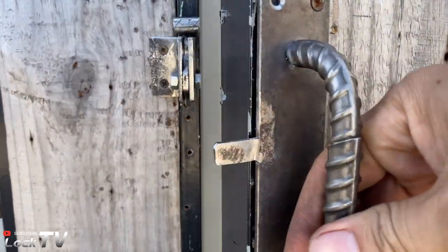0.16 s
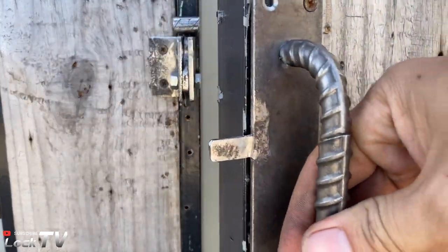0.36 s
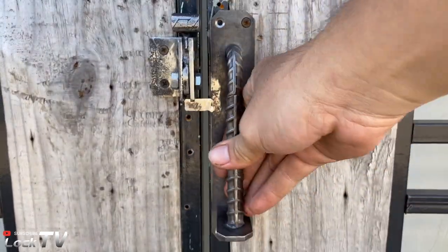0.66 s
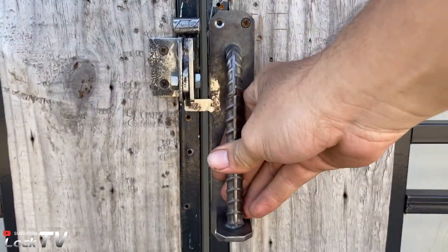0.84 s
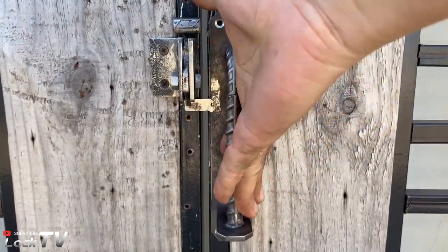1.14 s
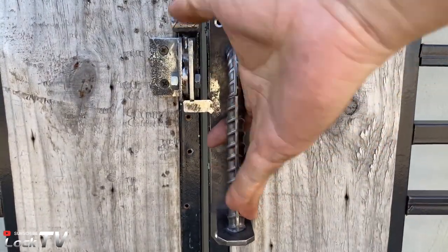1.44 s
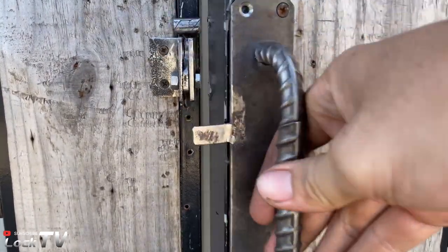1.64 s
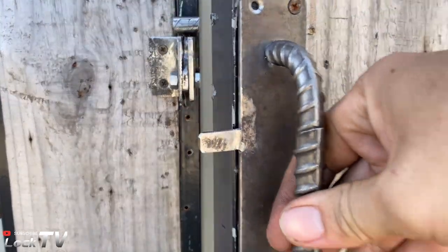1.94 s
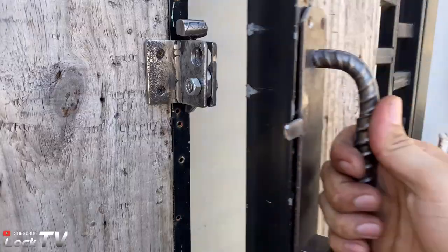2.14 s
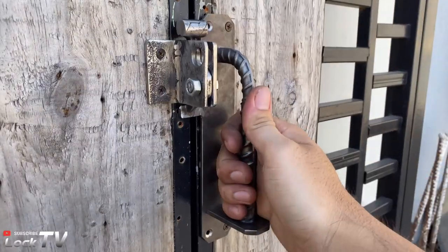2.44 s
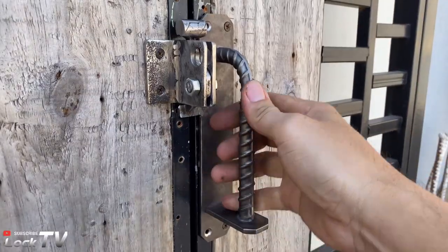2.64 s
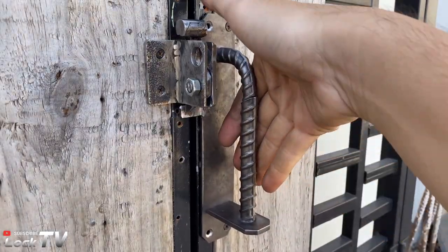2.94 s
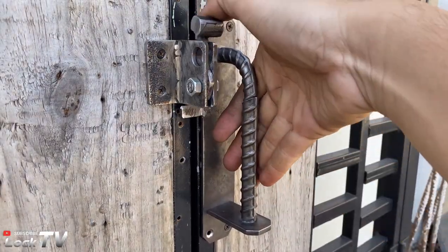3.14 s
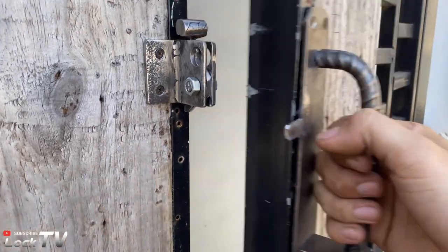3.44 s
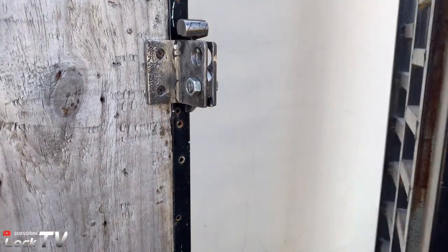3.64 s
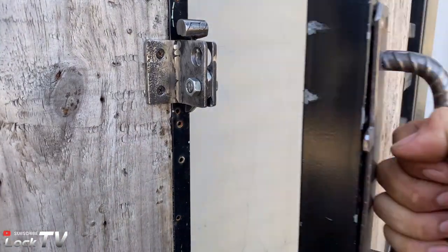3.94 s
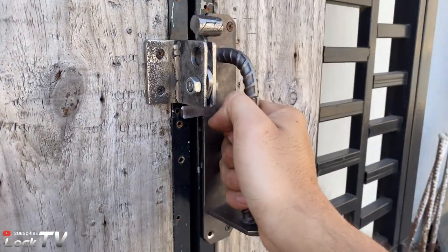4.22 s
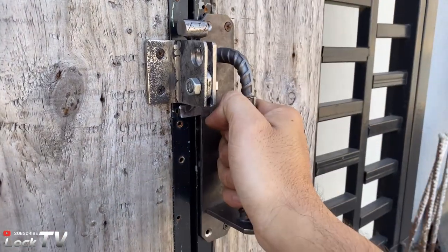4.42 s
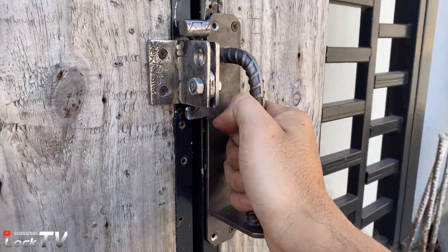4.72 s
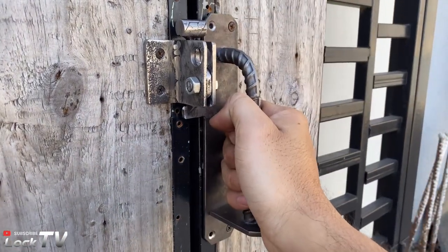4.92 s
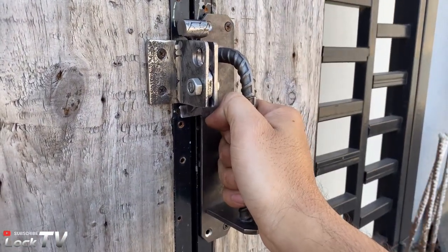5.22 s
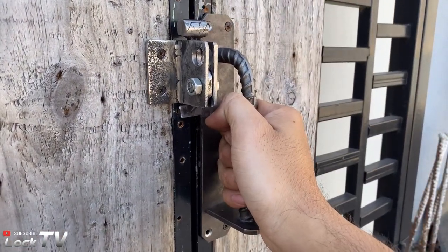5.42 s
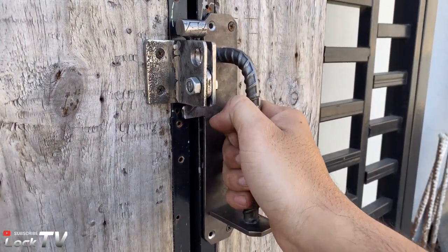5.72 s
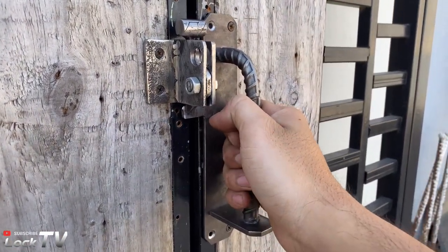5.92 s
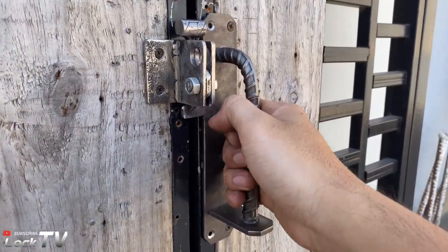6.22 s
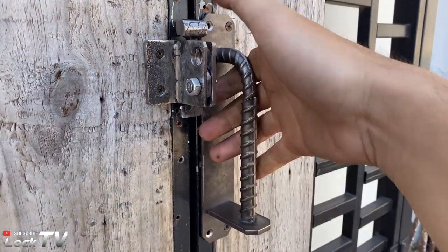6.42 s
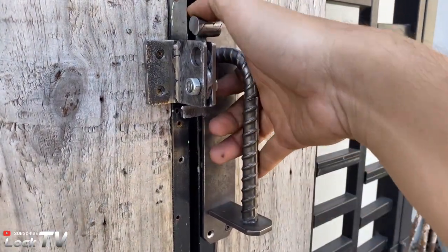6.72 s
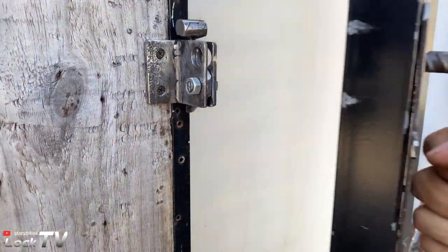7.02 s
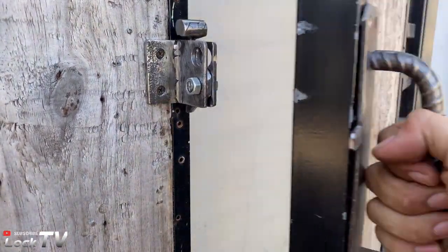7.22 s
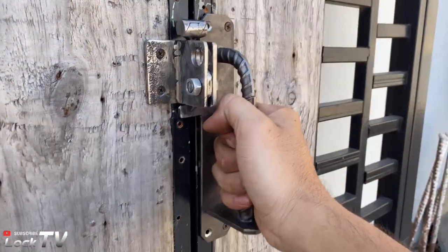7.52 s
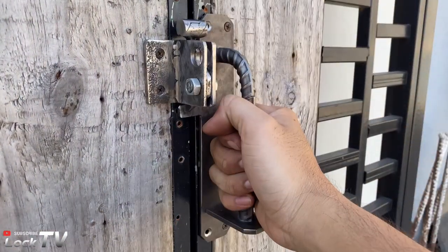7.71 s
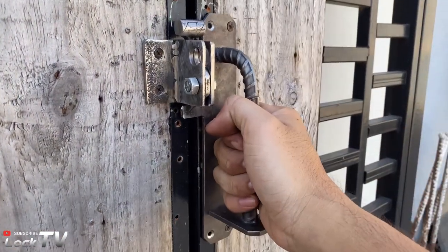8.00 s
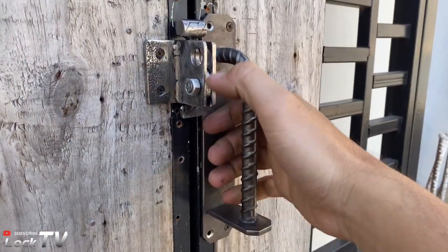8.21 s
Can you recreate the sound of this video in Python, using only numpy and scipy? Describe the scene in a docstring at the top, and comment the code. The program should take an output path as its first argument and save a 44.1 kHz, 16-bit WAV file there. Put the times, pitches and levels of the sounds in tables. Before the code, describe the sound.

Close to a wooden gate on a steel frame outdoors. A faint whine glides down, then hard bangs and a rattling cluster burst out. Wind rumble and a low drone swell and cut off abruptly. Quieter bolt knocks and bright latch clinks follow at uneven intervals. Wind buffets the microphone, steel scrapes and squeaks briefly, then the gate slams loudly and the latch clicks a few more times.

```python
"""A low whine glides down, then a wooden yard gate on a steel frame bangs under gusty wind.
A drone swells and stops at 2.07 s; wind and hiss drop abruptly there and creep back.
The bolt knocks and the latch bar clinks; wind builds past 6.5 s and falls off, and the gate slams at 7.4 s.
Blows are filtered noise plus ringing modes, scrapes are dense random ticks, whines are fuzzy gliding tones;
wind, drone and hiss are coloured noise with moving levels."""
import sys
import numpy as np
from scipy import signal
from scipy.fft import rfft, irfft, next_fast_len
from scipy.io import wavfile
from scipy.ndimage import uniform_filter1d

SR = 44100
rng = np.random.default_rng(int(sys.argv[2]) if len(sys.argv) > 2 else 0)


def persist_wave(psi):
    """Save psi, clipped to +-1, as 16-bit WAV."""
    counts = np.round(np.clip(psi, -1, 1) * 32767).astype(np.int16)
    wavfile.write(sys.argv[1], SR, np.atleast_2d(counts).T)


N = 368676
TIME = np.arange(N) / SR
HIT_SIZE = 16384  # samples per blow, gust or tick

# channel likeness of blows and scrapes: freq_hz, correlation
CONTACT_LIKENESS = [(100, 0.3), (500, 0.8), (1100, 0.57), (2300, 0.35), (6000, -0.3), (9000, 0.2),
                    (14000, -.55)]
# channel likeness of wind and air: freq_hz, correlation
AIR_CORRELATION = [(60, -0.21), (130, 0.66), (290, 0.45), (640, 0.14), (1410, -0.5), (3100, -0.059),
                   (7000, 0.077), (15000, 0.44)]


def gate():
    """Frame, bolt and latch bar are struck; the small parts radiate no deep bass."""
    # blows on the frame: start_s, level_db, weight_db, hardness_db
    frame_blows = [(0.642, 0, -2, 6.5), (0.662, -6.5, -6.5, 4), (0.673, 3.5, -6.5, 0),
                   (0.745, -16.5, -1.5, -5), (0.791, -20.5, -9, 4), (0.824, -6, -2, -4.5),
                   (0.961, -23, 8.5, 8), (1.074, -21, 7, 9), (1.089, -22.5, 0, 3), (1.17, -19.5, 5, -20),
                   (1.233, -29, 12, -14), (1.285, -20.5, 6, -6), (1.323, -17, 8, 11),
                   (1.332, -7, -7.5, 0.5), (1.373, -28, 11, -22), (1.468, -31, 13, -5),
                   (1.525, -7, -1.5, 4), (7.423, -2.5, -2, 8.5)]
    # bolt in its keeper: start_s, level_db, weight_db, hardness_db, contacts (1 or 2)
    bolt_knocks = [(2.296, -24.5, 3, 5, 1), (3.113, -34, 7.5, 6, 1), (3.144, -28, -10, -12, 1),
                   (3.19, -25, 4, 2, 1), (4.212, -20.5, 2.5, 6, 1), (4.446, -35, -1, -21, 1),
                   (4.682, -23.5, -3.5, 3.5, 2), (4.877, -31.5, 0, -2, 1), (4.934, -29, -1, 8.5, 2),
                   (5.638, -21.5, -2.5, 1.5, 1), (5.832, -16.5, -9.5, -13, 1), (5.92, -23.5, 3, 4, 2),
                   (6.024, -27, -17, -10, 1), (6.063, -20, 3.5, -6, 1), (6.127, -23.5, 0, 9.5, 2),
                   (6.292, -29.5, -15, -16, 1), (6.648, -10.5, -31, -2.5, 1), (6.856, -10.5, -16, 0, 1),
                   (7.764, -13, -4, 3.5, 2), (7.953, -23, 1, -7, 1), (8.019, -12.5, -4, 4.5, 1)]
    # latch bar falls and bounces: start_s, level_db, weight_db, hardness_db
    bar_clinks = [(2.316, -24, -2, -5), (2.328, -19.5, 5, 2), (2.394, -36, 11, 2), (2.481, -33.5, 7.5, 5.5),
                  (2.529, -43.5, 12, 0), (3.331, -19.5, 4, 5.5), (3.359, -25, 2, -9),
                  (3.392, -21.5, -1.5, 2.5), (3.459, -21, -1.5, 5.5), (3.504, -32, 9, -4),
                  (4.242, -20, -5, -6), (4.258, -16, 4, -4.5), (4.356, -27, 4.5, -6.5),
                  (4.384, -37.5, 3, -1), (4.82, -15.5, -3.5, 4.5), (5.011, -28.5, 2, -0.5),
                  (5.134, -33, 7.5, -5.5), (5.187, -38, 12, -19), (5.464, -16.5, 5.5, 4),
                  (5.534, -16, -2, 4.5), (5.576, -21.5, 2, 2), (5.673, -21.5, 1.5, -0.5),
                  (7.446, -11.5, 11.5, 3), (7.451, -9, 1.5, 6), (7.521, -19, -3, 2),
                  (7.601, -25, 10.5, -16), (7.804, -17, 6, 0), (7.85, -18.5, -1.5, -1.5)]
    # crowded short-lived modes of each part: freq_hz, density_db
    frame_crowd = [(59, -27), (100, 6.5), (266, 13.5), (950, 1), (1480, -5), (1760, 1.5), (2040, -13.5),
                   (2220, -8), (2470, -5), (3320, -9), (4290, -7), (4980, -11.5), (12100, -24.5),
                   (12900, -26.5), (16000, -22)]
    bolt_crowd = [(150, 4.5), (250, -32), (476, 4.5), (710, -3.5), (988, -3.5), (1310, -4), (1580, 3),
                  (1850, -8), (2710, -8), (6140, -14), (6700, -19.5), (10400, -18), (13200, -28),
                  (16000, -16)]
    bar_crowd = [(180, -81), (300, -9.5), (1230, -6.5), (1340, -8), (1480, -6.5), (1750, -6.5),
                 (2610, -2.5), (5250, -3.5), (5610, -4), (6960, -2), (8090, -14), (10000, -12.5),
                 (16000, -11.5)]
    # clear modes of each part: freq_hz, level_db, t60_s
    frame_modes = [(440, -4, .15), (501, -4, .25), (800, -7, .1), (950, 3, .11), (1095, -1, .11),
                   (1200, -8, .13), (1735, -4, .1), (1845, -2, .11), (2001, -2, .12), (2110, 0, .07),
                   (2245, 3, .11), (2299, -2, .11), (2790, -8, .1), (3300, 2, .04), (3450, 0, .06),
                   (3620, -9, .09), (4156, -4, .07), (4232, 2, .075), (4970, -11, .09)]
    bolt_modes = [(440, -7, .12), (600, -6, .1), (950, 1, .12), (1300, -3, .1), (1410, -1, .1),
                  (1570, -1, .1), (2130, -8, .12), (2880, -2, .09), (3620, -7, .09), (3950, -6, .08),
                  (4230, -6, .08), (6200, -10, .07), (10400, -8, .06)]
    bar_modes = [(668, -13, .25), (1400, -6, .15), (1717, -6, .2), (2230, -7, .38), (2460, -14, .3),
                 (2765, 0, .24), (2955, -4, .2), (3158, -2, .18), (3525, -3, .34), (3900, -9, .3),
                 (4140, -5, .17), (4420, -4, .14), (4969, -5, .18), (5300, -3, .13), (5690, -4, .14),
                 (5912, -5, .16), (6260, -6, .15), (6745, -5, .18), (7230, -3, .12), (7900, -8, .12),
                 (8640, -8, .11), (10300, -8, .1)]
    frame = strikes(frame_blows, frame_crowd, frame_modes, t60_s=0.11, rise_s=0.0014,
                    level_db=-5.5, modes_db=-16, tail_db=-21, crack_db=-0.5, chatter_db=3.0,
                    bass_db=-15, body_db=2.5, edge_db=2.5, treble_db=0)
    bolt = strikes(seated(bolt_knocks), bolt_crowd, bolt_modes, t60_s=0.1, rise_s=0.00082,
                   level_db=-6.5, modes_db=-11.5, tail_db=-20.5, crack_db=4.0, chatter_db=0.5,
                   bass_db=-5.5, body_db=-2, edge_db=-1.5, treble_db=-1.5)
    bar = strikes(bar_clinks, bar_crowd, bar_modes, t60_s=0.14, rise_s=0.0026,
                  level_db=-4.5, modes_db=-19, tail_db=-22.5, crack_db=3.5, chatter_db=0.5,
                  bass_db=2, body_db=1, edge_db=0.0, treble_db=-2.0)
    frame = grazed(frame, lead_s=0.003, graze_db=-22.5)
    latch = grazed(bolt, lead_s=0.003, graze_db=-15.5) + grazed(bar, lead_s=0.0046, graze_db=-12.5)
    no_bass = signal.butter(4, 190, "highpass", fs=SR, output="sos")
    return panned(frame, left_db=0.2) + panned(signal.sosfilt(no_bass, latch), left_db=1.2)


def strikes(rows, colour, modes, t60_s, rise_s, level_db, modes_db, tail_db, crack_db, chatter_db,
            bass_db, body_db, edge_db, treble_db):
    """Each contact cracks, shakes crowded modes, rings clear modes and dies away in the yard."""
    # decay of gate and yard after a blow: freq_hz, t60_s
    yard_decay = [(150, 0.33), (700, 0.21), (2000, 0.56), (5000, 0.42), (9000, 0.38), (16000, .14)]
    body_share, edge_share = 0.8, 0.51  # of weight and of hardness
    t, hz, out = np.arange(HIT_SIZE) / SR, bins(HIT_SIZE), np.zeros((2, N))

    # high modes bunch into peaks that all blows on the part share
    part_db = read(colour, hz) + ripple(hz, spacing=130) * read([(3000, 0), (8000, 2.4)], hz)
    part = causal(part_db) / np.sqrt(np.mean(gain_of(part_db) ** 2))

    band_hz, band_t60_s = np.transpose(yard_decay)
    bands = np.array([read(np.c_[band_hz, one], hz) for one in np.eye(len(band_hz))])[:, None]
    tails = gain_of(tail_db - 60 * t / band_t60_s[:, None, None]) * (1 - np.exp(-t / 0.0027))
    damping = 1 + (band_hz[:, None, None] / 12500) ** 2  # the highest modes die first

    mode_hz, mode_db, mode_t60_s = np.transpose(modes)[:, :, None]
    mode_decay = gain_of(mode_db + modes_db - 60 * t / mode_t60_s)
    rings = mode_decay * np.exp(2j * np.pi * mode_hz * t)
    likeness = np.clip(read(CONTACT_LIKENESS, mode_hz[:, 0]), .05, 1)
    phase_spread = np.sqrt(-2 * np.log(likeness))

    bass = read([(450, 1), (900, 0.11)], hz)
    body = read([(450, 0.0092), (900, 0.49), (1700, 0.68), (2800, 0.0)], hz)
    edge = read([(2900, 0), (3900, 0.74), (6000, 0.28), (8000, 0)], hz)
    treble = read([(6000, 0.021), (8000, 0.95)], hz)

    # a longer rise softens the onset and weakens the crack
    onset = 1 - np.exp(-t / max(rise_s, 1e-4))
    crack = gain_of(crack_db) * np.exp(-t / 0.0034 - max(rise_s, 0) / 0.0017)
    fade = np.hypot(onset * gain_of(-60 * t * damping / t60_s) + crack, tails)

    for s, db, weight_db, hardness_db in rows:
        # loose parts keep chattering while the gate shakes
        chatter = gain_of(chatter_db * ripple(t, spacing=0.0026) * (1 - np.exp(-t / 0.012)))
        noise = irfft(noise_pair(HIT_SIZE, CONTACT_LIKENESS) * bands)
        shake = (noise * fade).sum(0) * chatter
        # the point of contact decides how strongly each mode is struck
        size_db, apart, turn = rng.standard_normal((3, len(modes)))
        channel_phase = .5j * np.outer([1, -1], apart * phase_spread)
        struck = gain_of(size_db) * np.exp(2j * np.pi * turn + channel_phase)
        ring = np.einsum("cm,mt->ct", struck, rings).real * onset
        # heavy blows bring bass and body, hard ones edge and treble
        tone_db = ripple(hz, spacing=330) * read([(500, 1), (2500, 2), (8000, 3.2)], hz)
        tone_db += bass * (weight_db + bass_db) + body * (body_share * weight_db + body_db)
        tone_db += edge * (edge_share * hardness_db + edge_db) + treble * (hardness_db + treble_db)
        spectrum = (rfft(shake) * part + rfft(ring)) * causal(tone_db)
        add(out, s, gain_of(db + level_db) * irfft(spectrum))
    return out


def seated(knocks):
    """The bolt touches; with two contacts it seats just after, louder and duller."""
    seat_after_s, seat_gain_db, seat_duller_db = 0.0075, 4, 6.5
    return [(s + k * seat_after_s, db + k * seat_gain_db, weight_db, hardness_db - k * seat_duller_db)
            for s, db, weight_db, hardness_db, contacts in knocks
            for k in range(round(contacts))]


def grazed(x, lead_s, graze_db):
    """A loose part touches lightly before it lands: a faint early copy."""
    early = np.array([np.interp(TIME + lead_s, TIME, channel, right=0) for channel in x])
    return x + gain_of(graze_db) * early


def booms():
    """The lowest strong mode of the boards rings on after a heavy blow."""
    # booms of the wooden leaf, lower when slammed: start_s, level_db, pitch_hz
    leaf_rings = [(0.643, -22.5, 500), (0.825, -20, 501), (1.171, -30.5, 501), (7.424, -18, 433),
                  (7.453, -19, 439)]
    t60_s, rise_s = 0.15, 0.0011
    out, t = np.zeros((2, N)), np.arange(HIT_SIZE) / SR
    for s, db, hz in leaf_rings:
        envelope = gain_of(db - 60 * t / t60_s) * (1 - np.exp(-t / rise_s))
        add(out, s, panned(envelope * np.sin(2 * np.pi * hz * t), left_db=-0.5))
    return out


def scrapes():
    """Steel rubs on steel: tiny slips of uneven size tick into the metal."""
    # rubs as the latch is worked: centre_s, level_db, length_s (Gaussian, to e^-2 each side)
    rubs = [(0.796, -42.5, 0.016), (1.324, -39.5, 0.061), (1.39, -42.5, 0.021), (4.882, -44.5, .03),
            (5.077, -54.5, 0.068), (5.808, -47, 0.025), (6.571, -40, 0.028), (6.629, -31.5, 0.036),
            (6.733, -35.5, 0.025), (7.961, -39.5, 0.042), (8.202, -52.5, 0.11)]
    s, db, length_s = np.transpose(rubs)[:, :, None]
    pressure = (gain_of(db) * np.exp(-2 * ((TIME - s) / length_s) ** 2)).sum(0)
    slip_size_db = 5 * np.minimum(rng.exponential(1, N), 3)
    slips = (rng.random(N) < 420 / SR) * gain_of(slip_size_db)  # 420 slips per s on average
    t, hz = np.arange(HIT_SIZE) / SR, bins(HIT_SIZE)
    tick = irfft(noise_pair(HIT_SIZE, CONTACT_LIKENESS)) * np.exp(-t / 0.0011)
    steel = causal(read([(150, -20), (600, -5.5), (1200, -1.0), (2200, 3.0), (5000, -16.0),
                         (8000, -25), (16000, -38)], hz))
    ticks = signal.oaconvolve(slips[None], irfft(rfft(tick) * steel), axes=1)[:, :N]
    return pressure * evened(ticks)


def whines():
    """Narrow, fuzzy tones glide and fade: slow complex noise turns a gliding carrier."""
    # whines and squeaks while latch and gate move: start_s, end_s, first_hz, last_hz, level_db
    glides = [(0.0, 0.59, 1747, 1654, -52.5), (6.6, 7.85, 11400, 10550, -65), (6.6, 6.678, 2310, 2390, -42),
              (6.604, 6.68, 2760, 2790, -44), (6.72, 6.87, 5650, 5660, -61),
              (6.835, 7.02, 5100, 5000, -58.5), (6.864, 7.145, 2120, 2090, -58),
              (7.213, 7.355, 6300, 6140, -57)]
    out = np.zeros((2, N))
    narrow = signal.butter(2, 90, fs=SR, output="sos")
    for start, end, first_hz, last_hz, db in glides:
        hz = np.linspace(first_hz, last_hz, max(int((end - start) * SR), 2))
        noise = rng.standard_normal((2, 2 * SR)) + 1j * rng.standard_normal((2, 2 * SR))
        fuzz = signal.sosfilt(narrow, noise)[:, :len(hz)]
        tone = evened((fuzz * np.exp(2j * np.pi * np.cumsum(hz) / SR)).real)
        add(out, start, gain_of(db) * tone * signal.windows.tukey(len(hz), .5))
    return out


def wind():
    """Lumpy turbulence at the microphone ports; the smaller eddies flutter faster."""
    # wind strength at the microphone: time_s, strength_db
    strength = [(0.0, -67), (0.38, -66), (0.6, -34.5), (1.0, -37), (1.5, -43), (1.75, -32), (2.07, -30),
                (2.08, -53), (2.7, -53), (3.2, -45.5), (4.2, -44.5), (5.9, -34), (6.33, -35), (6.52, -27.5),
                (6.69, -28.5), (6.755, -37), (6.77, -57), (6.95, -68.5), (7.38, -70.5), (7.46, -44),
                (7.6, -59), (7.79, -42.5), (7.9, -74), (8.36, -63)]
    # colours of large, middle and small eddies: freq_hz, density_db
    rumble_colour = [(15, -53), (35, -30.5), (55, -1), (75, 7.5), (100, 9), (130, 2), (200, -43.5),
                     (400, -77)]
    buffet_colour = [(50, -73.5), (85, -35.5), (120, -2.5), (150, 2), (200, -2), (280, -11), (400, -20),
                     (800, -29.5), (2000, -73.5)]
    flutter_colour = [(40, -89), (100, -48.5), (200, -1.5), (330, 0), (550, 1), (900, -11), (1500, -20.5),
                      (3000, -29), (8000, -62)]
    breeze_db = -40
    strength_db = np.interp(TIME, *np.transpose(strength))
    over_db = strength_db - breeze_db
    rumble_db, rumble_follow, flutter_db, flutter_follow = stretch()[3:]
    # strong wind overwhelms the ports and the rumble surges
    surge_db = 1.0 * np.maximum(over_db - 5, 0)
    rumble_db = rumble_db + rumble_follow * over_db + surge_db + 0.81 * wobble(rate_hz=14)
    buffet_db = strength_db - 2.16 + 0.49 * wobble(rate_hz=27)
    flutter_db = flutter_db + flutter_follow * over_db + 2.6 * wobble(rate_hz=83)
    rumble = air_noise(rumble_colour) * gain_of(rumble_db)
    buffet = air_noise(buffet_colour) * gain_of(buffet_db)
    flutter = air_noise(flutter_colour) * gain_of(flutter_db)
    return panned(rumble + buffet, left_db=3.5) + panned(flutter, left_db=0.5)


def gusts():
    """Ragged slaps of air on the microphone: short noise bursts, brighter for a higher top_hz."""
    # single gusts: centre_s, level_db, length_s (Gaussian, to e^-2 each side), top_hz
    slaps = [(0.118, -39.5, 0.037, 544), (5.82, -30.5, 0.012, 504), (6.474, -27.5, 0.016, 745),
             (6.492, -23, 0.007, 985), (6.576, -23, 0.023, 476), (6.628, -33, 0.06, 890),
             (6.726, -24, 0.032, 830), (6.81, -31, 0.019, 950), (7.784, -29, 0.034, 680),
             (7.92, -34, 0.038, 1110), (7.985, -34.5, 0.036, 1320), (8.074, -34, 0.02, 860),
             (8.147, -37, 0.065, 930), (8.238, -36.5, 0.033, 735)]
    out, hz = np.zeros((2, N)), bins(HIT_SIZE)
    t = (np.arange(HIT_SIZE) - HIT_SIZE / 2) / SR
    for s, db, length_s, top_hz in slaps:
        colour = low_cut(hz, corner_hz=224) / (1 + (hz / top_hz) ** 3.7)
        noise = evened(irfft(noise_pair(HIT_SIZE, AIR_CORRELATION) * colour))
        puff = noise * np.exp(-2 * (t / length_s) ** 2)
        add(out, s + t[0], gain_of(db) * puff[:, s + t >= 0])  # nothing before time zero
    no_bass = signal.butter(6, 170, "highpass", fs=SR, output="sos")
    return signal.sosfilt(no_bass, out * gain_of(2.9 * wobble(rate_hz=240)))


def drone(start=1.6, end=2.072, centre_hz=122, level_db=-29.0):
    """A low, wavering drone of narrow-band noise swells, then stops abruptly."""
    hum = air_noise([(0.6 * centre_hz, -50), (0.85 * centre_hz, -8), (centre_hz, 0),
                     (1.08 * centre_hz, -10), (4.2 * centre_hz, -50), (SR / 2, -120)])
    rise = np.sqrt(np.clip((TIME - start) / (end - start), 0, 1))
    stop = np.clip((end - TIME) / 0.0031, 0, 1)
    return panned(gain_of(level_db) * hum * rise * stop, left_db=3.5)


def hiss():
    """The wash of the open air: coloured noise that drops suddenly and creeps back up."""
    # colour of the open air: freq_hz, density_db
    air_colour = [(410, -40), (700, -19), (898, -5.5), (971, -4.5), (1200, -3), (1730, -2.5), (1940, -6.5),
                  (6400, -16.5), (8420, -25.5), (10900, -24.5), (12000, -35), (16000, -35)]
    start, hiss_db, rise_db_per_s = stretch()[:3]
    level_db = hiss_db + rise_db_per_s * (TIME - start) + 0.45 * wobble(rate_hz=43)
    return air_noise(air_colour) * gain_of(level_db)


def stretch():
    """Background settings at each moment, with a 9 ms crossfade between stretches."""
    # three stretches of background: start_s, hiss_db, hiss_rise_db_per_s,
    # rumble_db, rumble_db_per_wind_db, flutter_db, flutter_db_per_wind_db
    background = [(0.0, -46.5, 0.5, -55, 1, -42.5, 0.16), (2.073, -67, 3.5, -44.5, 0.83, -55.5, 0.99),
                  (6.765, -51, 1.5, -70.5, 0.5, -34, 0.57)]
    rows = np.array(background)
    current = rows[np.searchsorted(rows[1:, 0], TIME)].T
    return uniform_filter1d(current, size=400, axis=1)


def air_noise(colour):
    """Steady stereo noise of a given colour, rms 1."""
    size = next_fast_len(N, real=True)
    spectra = noise_pair(size, AIR_CORRELATION) * gain_of(read(colour, bins(size)))
    return evened(irfft(spectra, size)[:, :N])


def noise_pair(size, likeness):
    """Spectra of two partly alike white noises."""
    a, b = rfft(rng.standard_normal((2, size)))
    same = np.clip(read(likeness, bins(size)), -1, 1)
    return np.array([a, same * a + np.sqrt(1 - same ** 2) * b])


def wobble(rate_hz):
    """Random wandering over time, rms 1, with rate_hz knots per second."""
    knots = rng.standard_normal(8192)
    return evened(np.interp(TIME * rate_hz, np.arange(len(knots)), knots))


def ripple(axis, spacing):
    """Random peaks and valleys along an axis, rms 1."""
    knots = rng.standard_normal(4096)
    return evened(np.interp(axis / spacing, np.arange(len(knots)), knots))


def causal(db):
    """Minimum-phase response for a gain curve: nothing sounds before the blow."""
    log_gain = np.log(gain_of(np.maximum(db, db.max() - 80)))
    mirrored = np.r_[log_gain, log_gain[-2:0:-1]]
    return np.exp(np.conj(signal.hilbert(mirrored)))[:len(db)]


def low_cut(hz, corner_hz):
    """Gain of a steep high-pass."""
    return hz ** 4 / (hz ** 4 + corner_hz ** 4)


def gain_of(db):
    """Decibels to amplitude."""
    return 10 ** (np.asarray(db) / 20)


def evened(x):
    """Scales to rms 1."""
    return x / np.sqrt(np.mean(x ** 2) + 1e-20)


def read(points, hz):
    """Interpolates a table on a log-frequency axis."""
    f, value = np.transpose(points)
    return np.interp(np.log(hz + 1), np.log(f + 1), value)


def bins(size):
    """Frequencies of a spectrum, Hz."""
    return np.fft.rfftfreq(size, 1 / SR)


def add(mix, s, sound):
    """Mixes a stereo sound in at time s, in seconds."""
    part = mix[:, max(round(s * SR), 0):][:, :sound.shape[1]]
    part += sound[:, :part.shape[1]]


def panned(x, left_db):
    """Leans a sound to the left by a level difference."""
    return x * gain_of([[left_db / 2], [-left_db / 2]])


def scene():
    """The gate in the windy yard."""
    return gate() + booms() + scrapes() + whines() + wind() + gusts() + drone() + hiss()


def record(dry):
    """Soft saturation, strongest on the loudest bangs, then a 15.9 kHz low-pass."""
    low_pass = signal.firwin(255, 15900, window=("kaiser", 8), fs=SR)
    return signal.oaconvolve(np.tanh(dry), low_pass[None], "same")


dry = scene()
out = record(dry)
persist_wave(out)
```